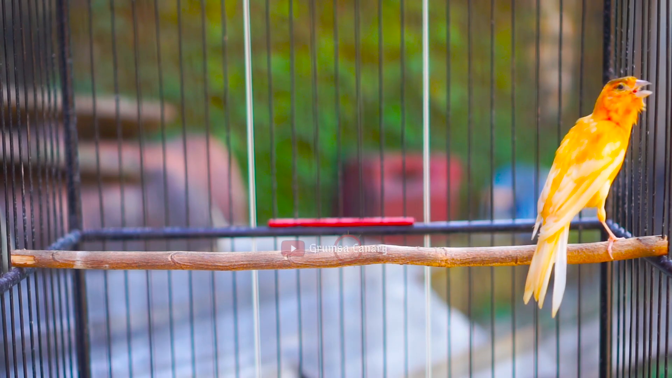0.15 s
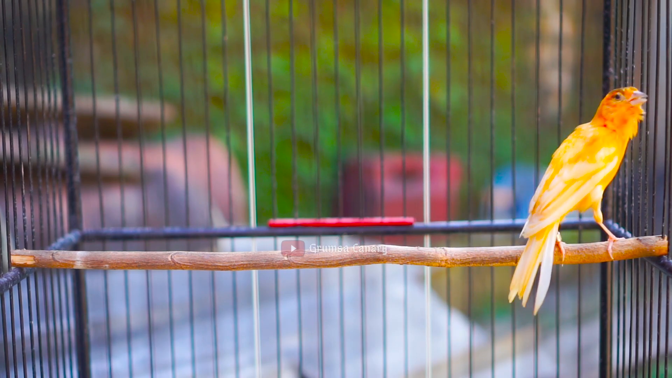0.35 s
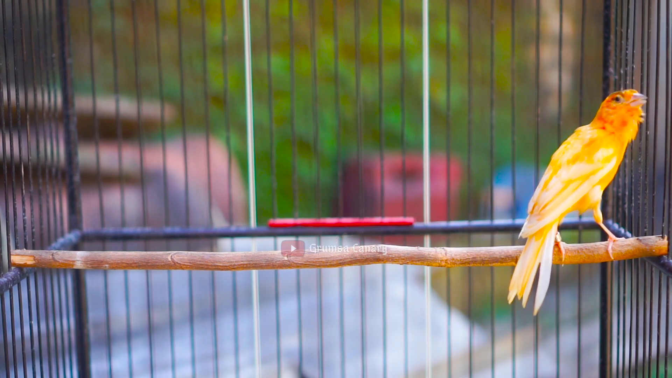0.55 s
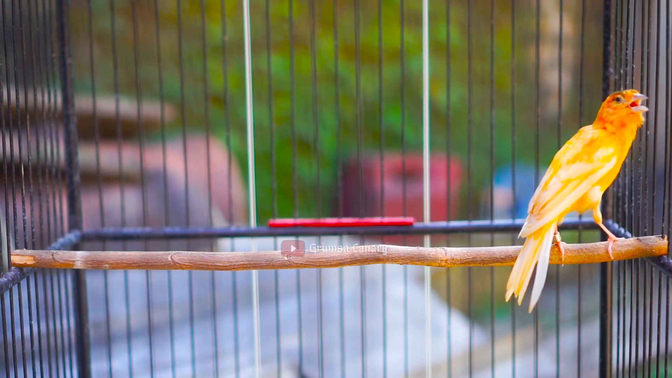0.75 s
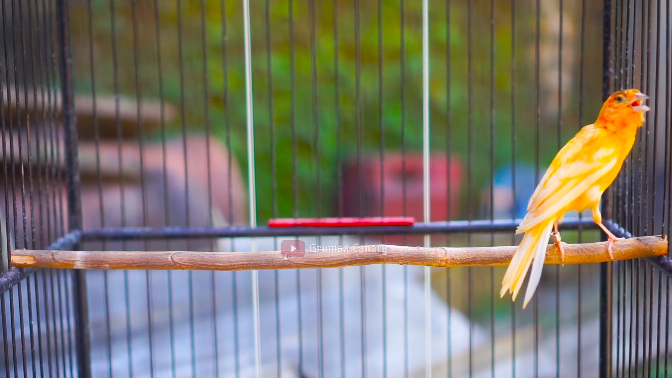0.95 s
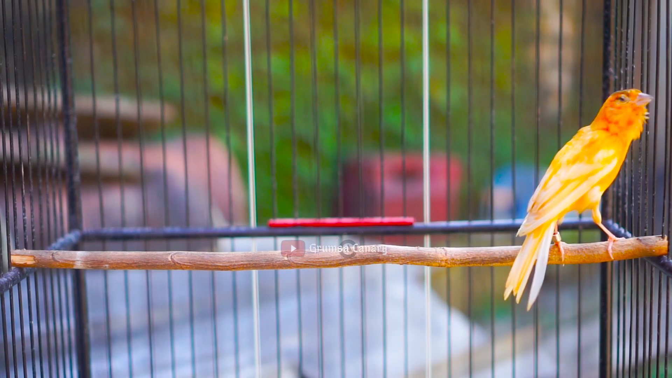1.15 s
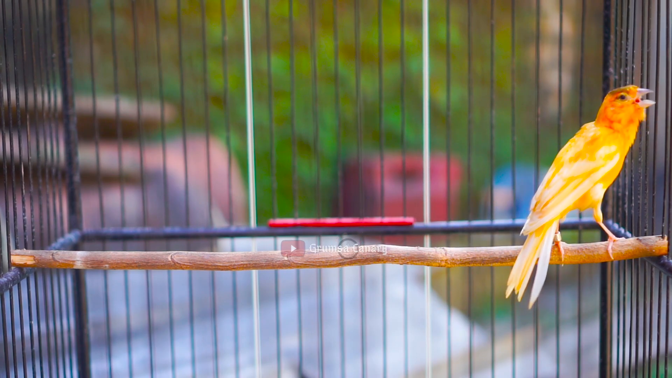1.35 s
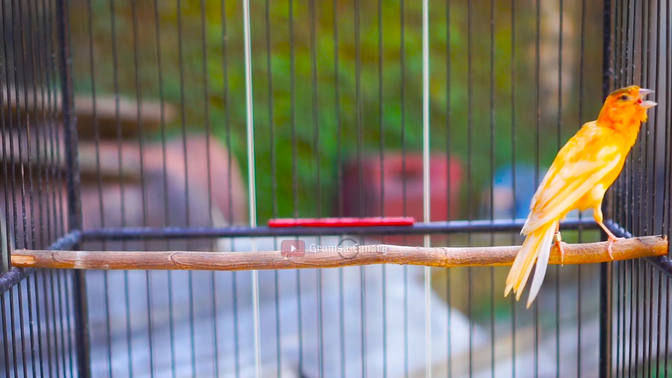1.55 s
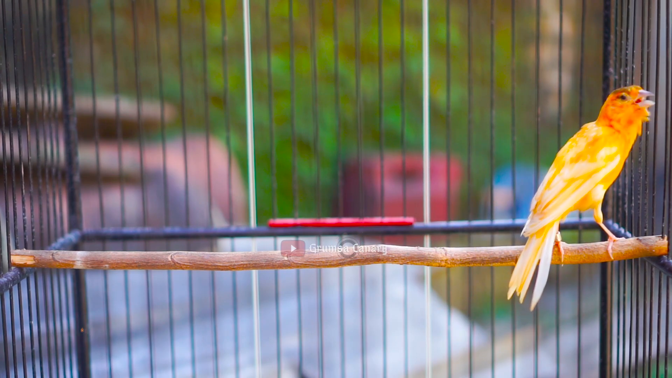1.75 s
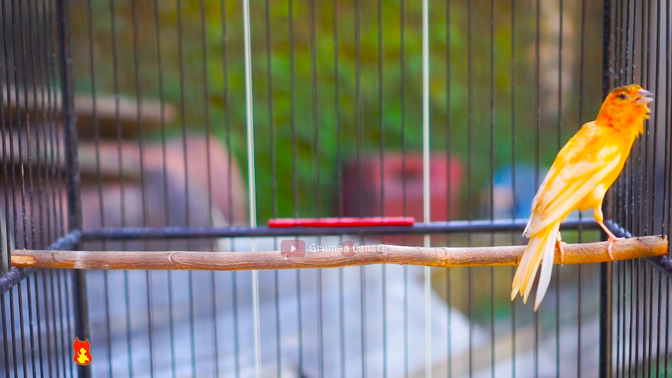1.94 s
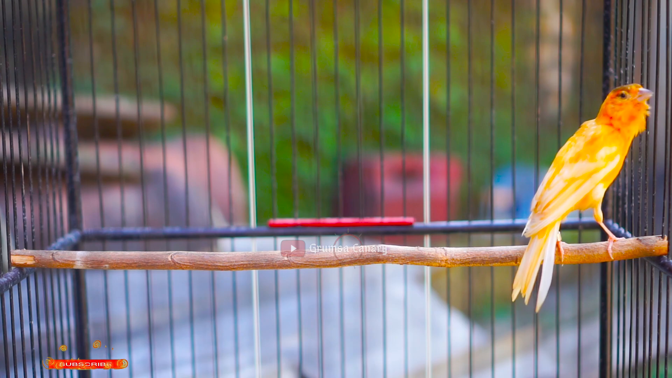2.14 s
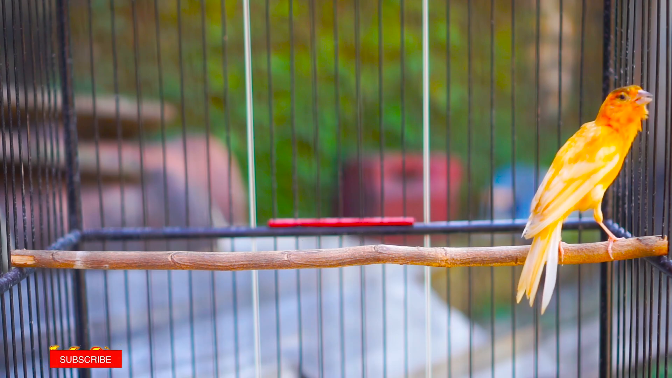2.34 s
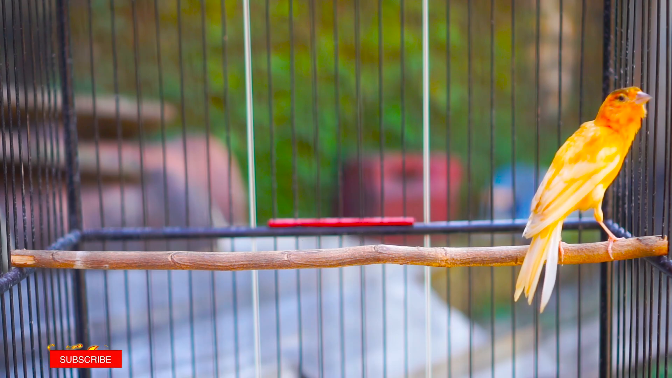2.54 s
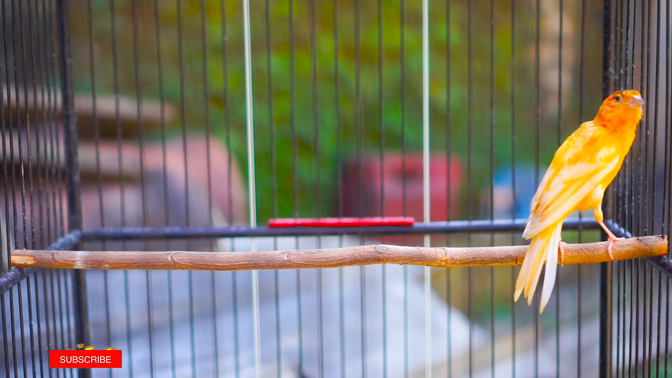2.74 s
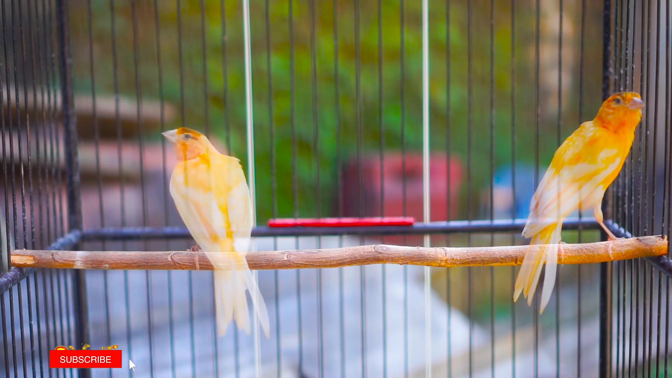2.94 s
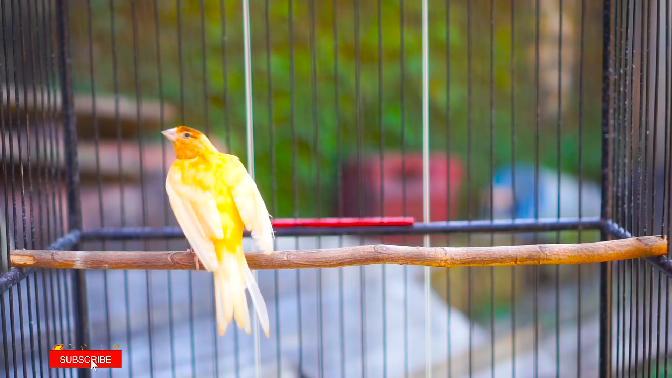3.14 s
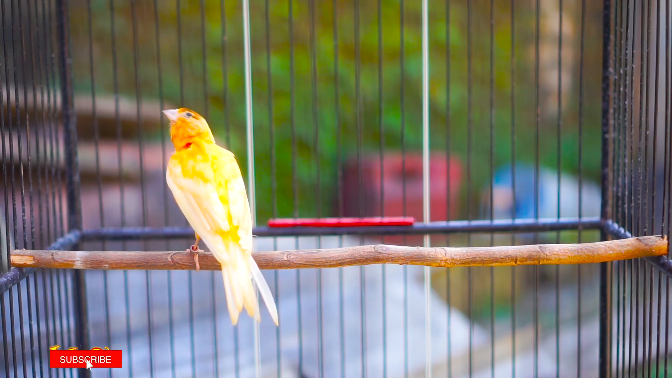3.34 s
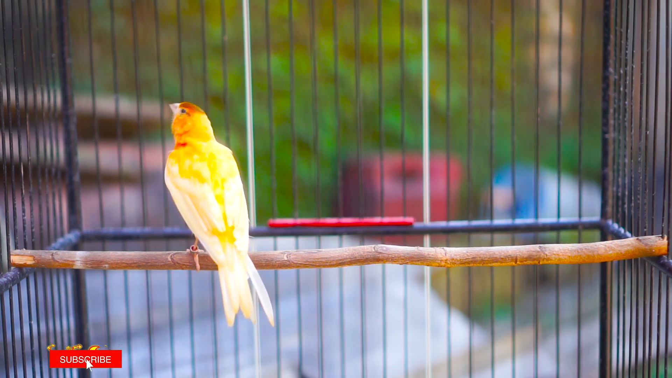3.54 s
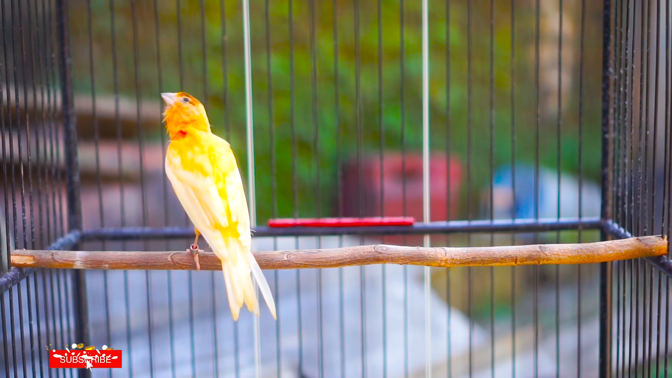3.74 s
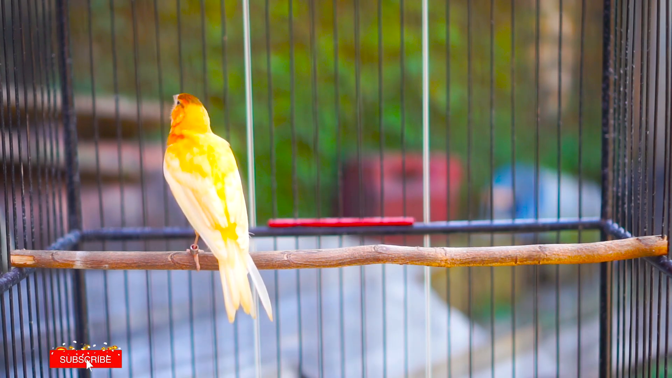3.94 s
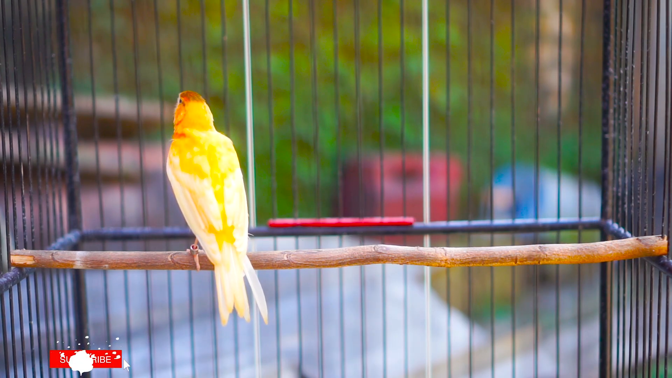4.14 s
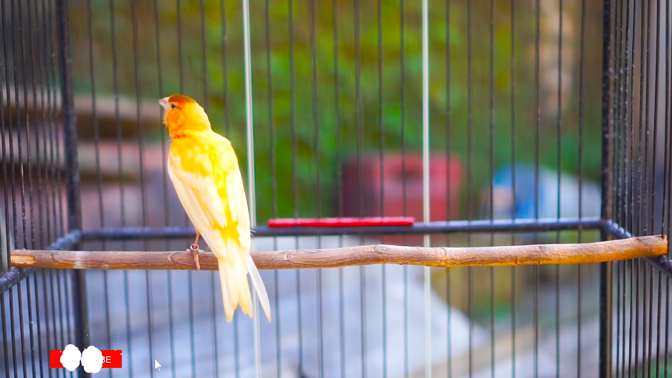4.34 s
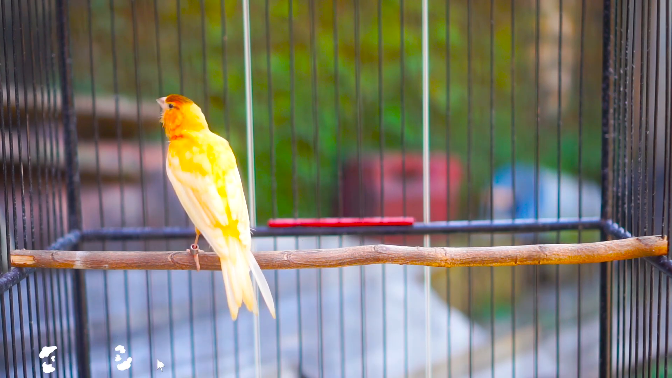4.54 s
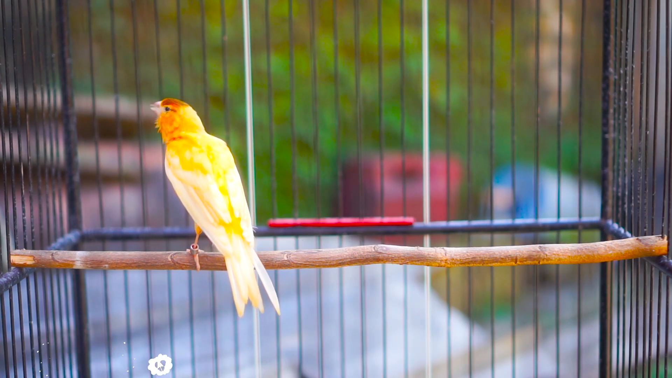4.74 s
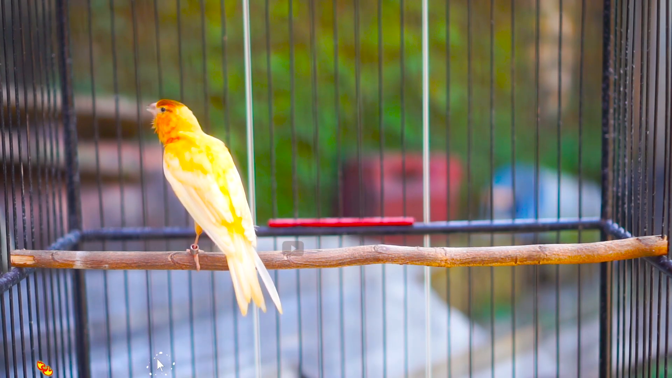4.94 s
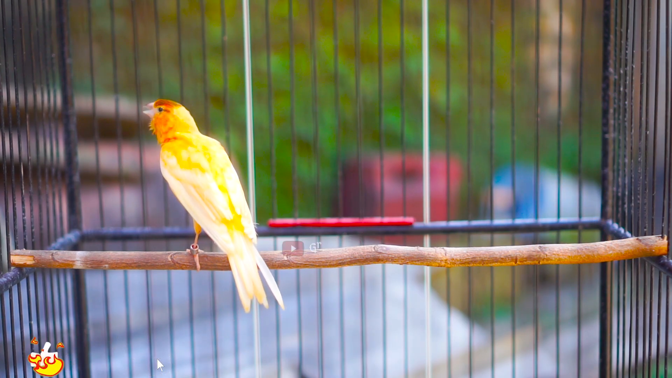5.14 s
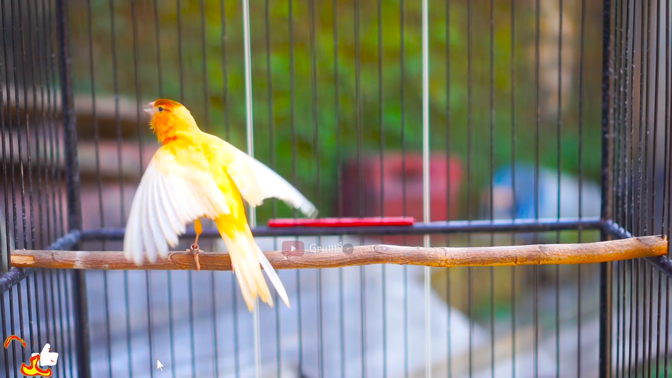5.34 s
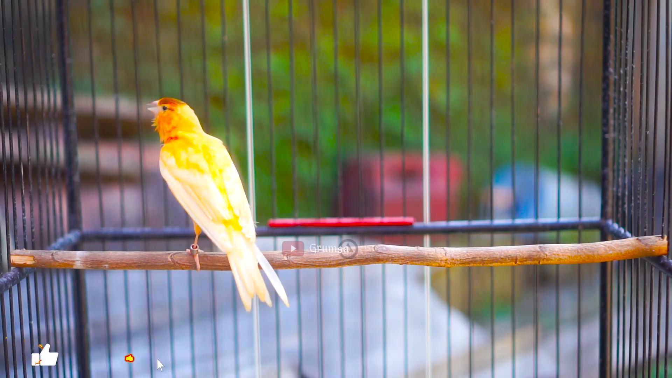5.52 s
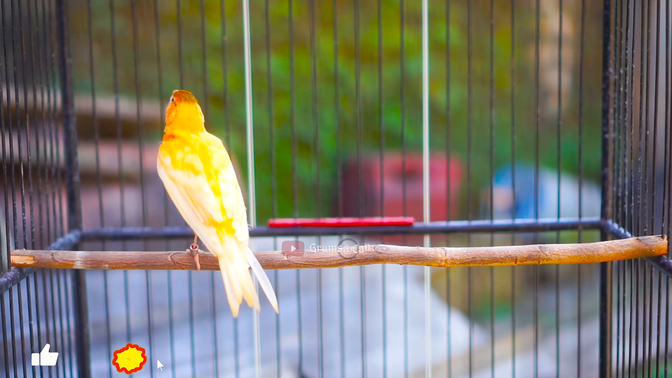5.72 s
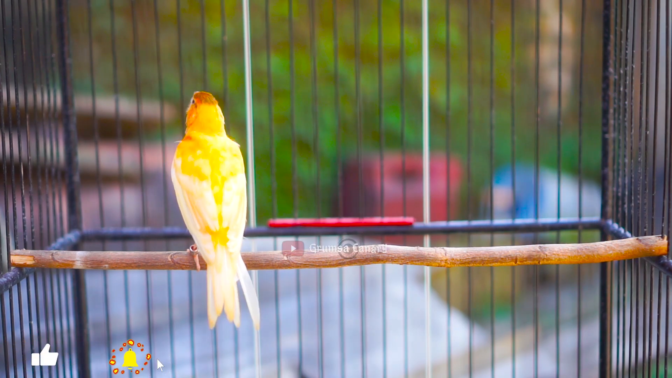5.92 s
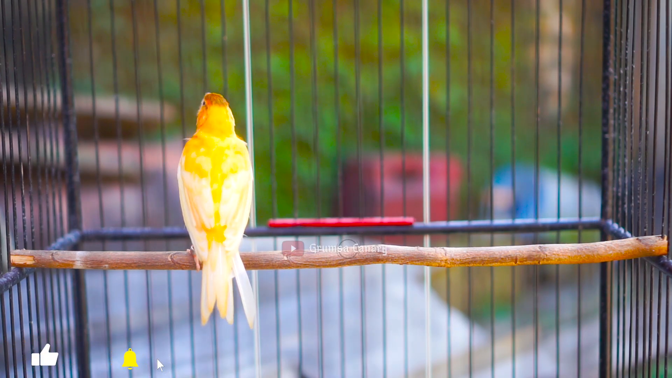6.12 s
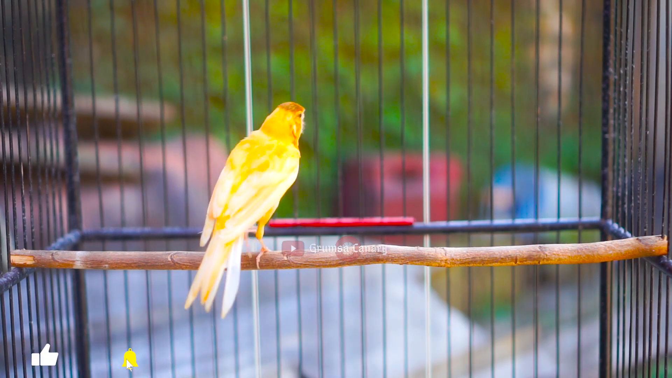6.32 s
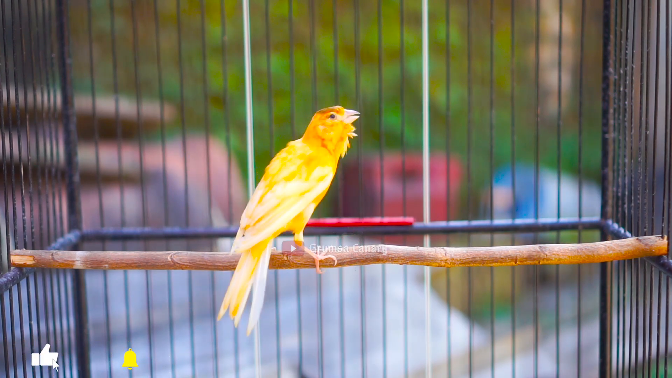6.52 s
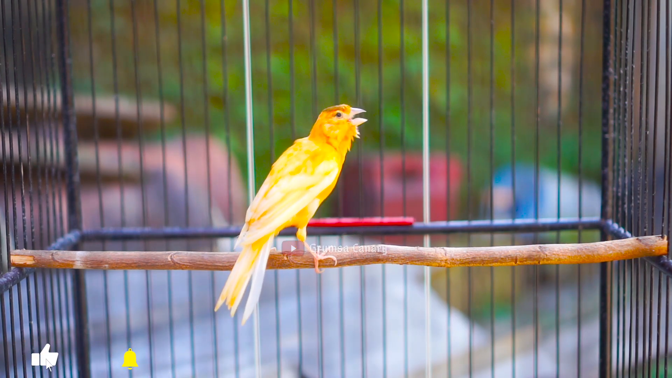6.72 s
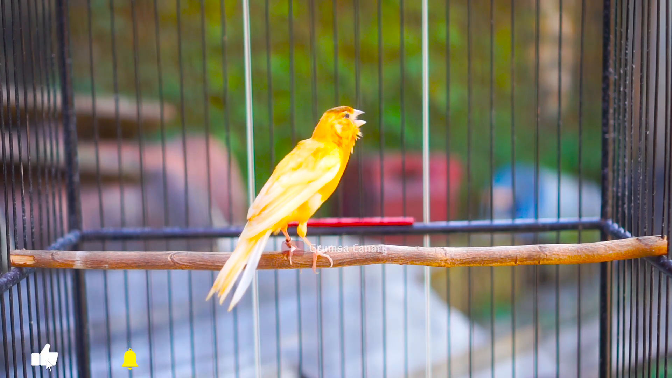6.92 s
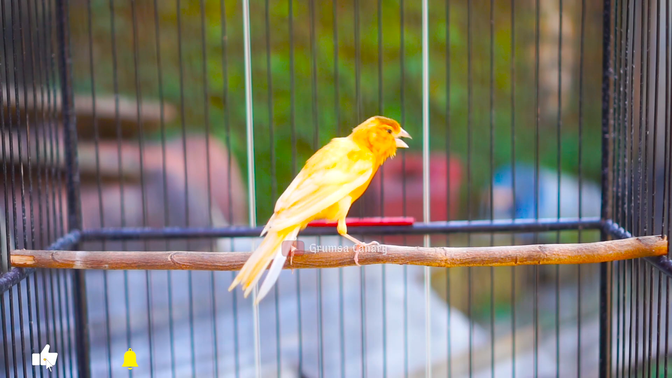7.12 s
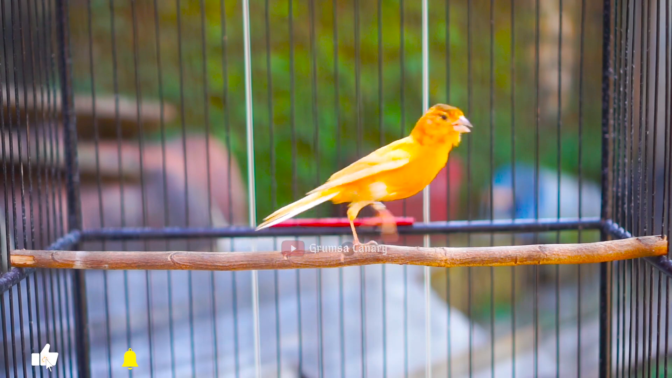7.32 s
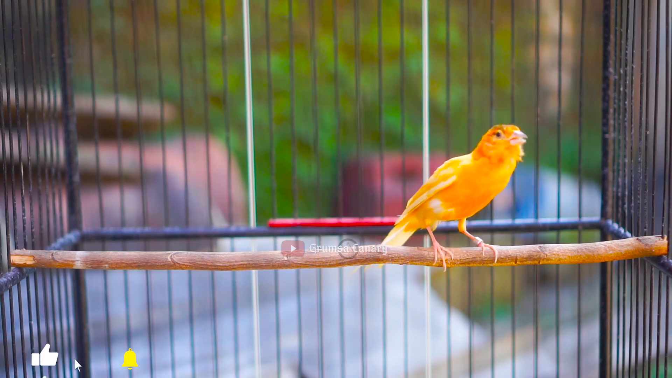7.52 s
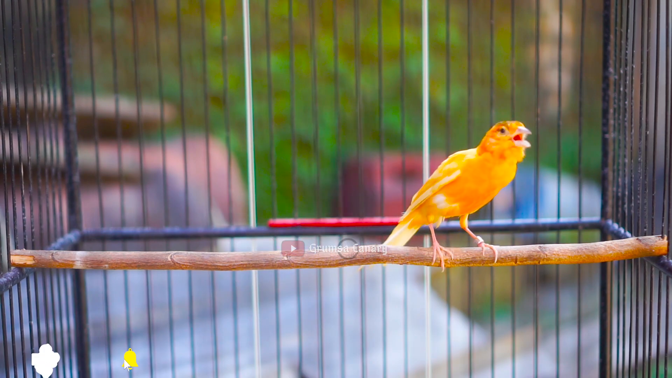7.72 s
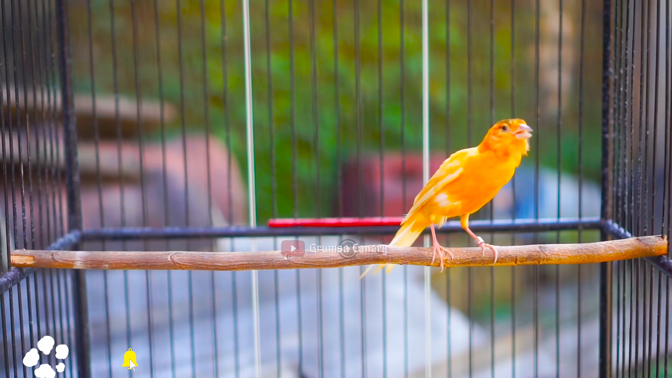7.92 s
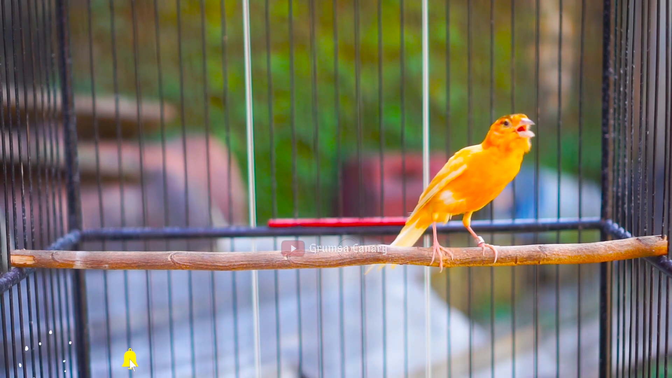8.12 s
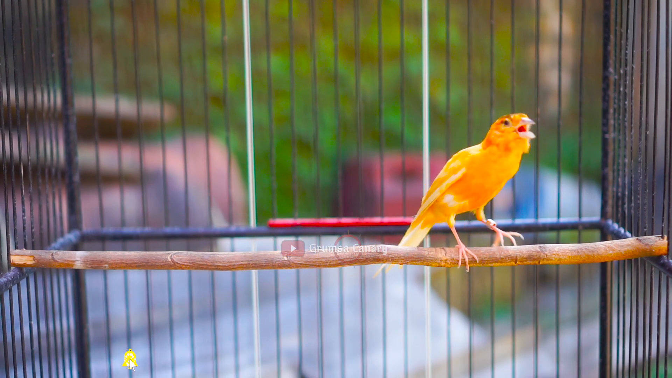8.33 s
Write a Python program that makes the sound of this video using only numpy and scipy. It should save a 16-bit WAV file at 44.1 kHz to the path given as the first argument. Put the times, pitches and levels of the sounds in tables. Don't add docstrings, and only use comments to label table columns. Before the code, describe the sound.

Piercing canary song in a hard-walled room: rapid downward chirps, sweeping slides, a short break, a growing trill, then chirps and slides again.

```python
import sys
import numpy as np
from scipy import signal
from scipy.fft import rfft, irfft, next_fast_len
from scipy.io import wavfile
from scipy.ndimage import uniform_filter1d, map_coordinates

SR = 44100
rng = np.random.default_rng(int(sys.argv[2]) if len(sys.argv) > 2 else 0)


def amplitude_ratio(level_db):
    exponent = np.asarray(level_db, float) / 20
    return 10 ** exponent


def inscribe(sig):
    pcm = np.round(np.clip(np.atleast_2d(sig).T, -1, 1) * 32767)
    wavfile.write(sys.argv[1], SR, pcm.astype(np.int16))


N = 369116


def canary():
    # (share of length [1], share of glide [1], level [dB])
    short_shape = [(-.1, -.3, -63), (0, -0.36, -38.5), (.15, -0.016, -14.5), (.3, 0.29, -5),
                   (.5, .49, -4.5), (.7, .69, 4.5), (.85, 0.893, 6.5), (.97, .99, -6.5), (1.12, 1.0, -33)]
    wide_shape = [(-.05, -0.16, -45.5), (0.031, -0.29, -31.5), (0.148, 0.01, -14), (.3, .18, -10.5),
                  (.46, 0.47, -5), (.6, 0.549, 4.5), (0.8, 0.82, 3), (0.968, 1.0104, -11.5),
                  (1.032, 1.01, -36)]
    trill_shape = [(-0.55, -.75, -56), (-0.21, -0.47, -39.5), (0, 0.13, -19.5), (0.24, 0.29, -6.5),
                   (0.43, .58, 3.5), (0.6, .82, 2.5), (0.76, .96, 4), (0.95, 1.066, -7.5), (1.1, 1.1, -40)]
    arch_shape = [(-.03, 0, -37), (0.051, -.01, -28.5), (.2, .02, -21.5), (0.399, .13, -18.5),
                  (.6, 0.37, -10.5), (.8, 0.67, -2), (0.878, .81, -0.25), (.96, 1, -6), (1.028, 1.0, -40.5)]
    slide_shape = [(-.02, 0.082, -41), (0.051, 0, -36), (.14, 0.09, -21), (.4, .236, -15.5),
                   (.6, .375, -18.5), (.75, 0.55, -6), (.88, .76, -2.1), (.96, 0.97, -4.5),
                   (1.02, 1.0, -45)]
    rise_shape = [(-.02, -.05, -42), (.05, .16, -23), (.12, .38, -7), (.23, .6, -3), (.37, .77, -1),
                  (.5, .915, -3), (.63, .975, -6.5), (.95, .995, -8), (1.02, 1.0, -40)]
    fade_shape = [(-.02, -0.15, -43), (.02, .05, -7.5), (.12, .3, -9), (.25, 0.52, -5.5), (0.399, .71, -11),
                  (0.651, .87, -18.5), (0.798, 0.94, -23), (.9, 1, -29), (0.998, 0.92, -42.5)]
    # (start [s], length [s], glide from [Hz], glide to [Hz], peak level [dB])
    arches = [
        (1.405, 0.14, 7286, 3110, -5.5),
        (7.902, 0.12, 7310, 3155, -5),
    ]
    slides = [
        (1.592, .172, 7680, 3067, -4.5),
        (8.073, 0.16467, 7660, 3225, -3),
        (8.286, 0.15, 7544, 3336, 0.5),
    ]
    rises = [
        (1.979, 0.19, 1873, 5108, -11),
        (2.215, 0.19, 1886, 5094, -10),
    ]
    fades = [
        (1.801, .134, 3176, 5254, -7),
    ]
    pressed_by_type = [5, 4, -4, 5, 7, 5, 5.5]
    even_by_type = [-7, -5.5, -4, -2, -7.5, -1.5, 4.5]
    # (time [s], level [dB])
    breaks = [(7.275, -54.5), (7.388, -61), (7.503, -65), (7.733, -56), (7.852, -62.5)]
    break_hz, break_s = 1330, 0.016

    out = np.zeros((2, N))
    shapes = [short_shape, wide_shape, trill_shape, arch_shape, slide_shape, rise_shape, fade_shape]
    phrases = [short_chirps(), wide_chirps(), trill(), arches, slides, rises, fades]
    for shape, notes, *voice_db in zip(shapes, phrases, pressed_by_type, even_by_type):
        when, glide, shape_db = np.transpose(shape)
        for s, length_s, from_hz, to_hz, db in notes:
            pitch_hz = from_hz + glide * (to_hz - from_hz)
            voice_rows = np.tile(voice_db, (len(when), 1))
            rows = np.c_[s + when * length_s, pitch_hz, db + shape_db, voice_rows]
            if shape is trill_shape:
                rows[:, 2:] += trill_tip(glide, length_s, db)
            add_note(out, rows, whistle)
    for s, db in breaks:
        add_note(out, [(s, 1.07 * break_hz, db, 0, 0), (s + break_s, break_hz, db, 0, 0)], whistle)
    return out


def short_chirps():
    opening_notes = [0, 4, 5]
    return_notes = [0, 1, 12, 13, 17]
    # (time of loud part [s], glide to [Hz], peak level [dB])
    opening = [
        (0.0491, 3030, -12),
        (0.3546, 3050, -12),
        (0.4351, 3075, -12.5),
    ]
    coming_back = [
        (5.5401, 3216, -16.5),
        (5.6191, 3163, -13),
        (6.4485, 3130, -10),
        (6.526, 3105, -11.5),
        (6.8464, 3135, -10.5),
    ]
    duty, loud_at = 0.65, 0.81
    fall_hz, fall_hz_per_db = 2615, 78

    runs = []
    for numbers, rows in [(opening_notes, opening), (return_notes, coming_back)]:
        s, beat_s, to_hz, db = paced(numbers, rows)
        length_s = duty * beat_s
        from_hz = to_hz + fall_hz + fall_hz_per_db * (db + 12)
        runs.append(np.c_[s - loud_at * length_s, length_s, from_hz, to_hz, db])
    return np.concatenate(runs)


def wide_chirps():
    # (start [s], length [s], peak level [dB])
    chirps = [(0.4842, .058, -11), (0.579, .075, -12), (0.6823, .08, -11), (0.796, .083, -11),
              (0.9112, 0.084, -11), (1.037, 0.083, -11.5), (1.1576, .088, -12), (1.276, 0.088, -11.5),
              (6.885, .063, -9), (6.9798, 0.076, -10), (7.0868, 0.082, -9.5), (7.201, 0.086, -9),
              (7.3134, .083, -10), (7.4307, 0.08, -10.5), (7.5442, .082, -11), (7.6565, 0.087, -11.5),
              (7.7724, 0.088, -11.5)]
    fall_hz_per_s, low_hz = 45460, 2639
    full_s, lift_hz_per_s = .08, 11000

    s, length_s, db = np.transpose(chirps)
    to_hz = low_hz + lift_hz_per_s * np.maximum(full_s - length_s, 0)
    return np.c_[s, length_s, to_hz + fall_hz_per_s * length_s, to_hz, db]


def trill():
    trill_notes = [0, 1, 8, 19, 25, 29, 37, 40, 47]
    # (time of loud part [s], glide to [Hz], peak level [dB])
    swell = [
        (3.396, 3930, -49),
        (3.4378, 4550, -36.5),
        (3.6827, 4560, -24),
        (4.0782, 4478, -17.5),
        (4.3057, 4400, -19.5),
        (4.4663, 4410, -16),
        (4.8349, 4538, -12.5),
        (4.998, 4594, -11),
        (5.4033, 4524, -11.5),
    ]
    from_hz = 2800
    duty, loud_at = .42, 0.76

    s, beat_s, to_hz, db = paced(trill_notes, swell)
    length_s = duty * beat_s
    return np.c_[s - loud_at * length_s, length_s, np.full(len(s), from_hz), to_hz, db]


def trill_tip(glide, length_s, db):
    relax_db, soft_press_db_per_db = 12, 1.25
    tip = np.clip(glide, 0, 1) ** 2
    longer_db = 1.14 * (1000 * length_s - 20.9)
    level_db = longer_db * (tip - .5)
    pressed_db = -relax_db * tip - soft_press_db_per_db * (db + 11)
    even_db = relax_db * tip + 2 * longer_db
    return np.c_[level_db, pressed_db, even_db]


def paced(numbers, rows):
    every = np.arange(numbers[-1] + 1)
    s, to_hz, db = [np.interp(every, numbers, column) for column in np.transpose(rows)]
    return s, np.gradient(s), to_hz, db + .6 * rng.standard_normal(len(s))


def whistle(hz, level_db, pressed_db, even_db):
    # (multiple [1], level [dB])
    overtones = [(2, -26.5), (3, -31.5), (4, -47), (5, -54.5)]
    # (frequency [Hz], level [dB])
    brightness = [(5000, -33.5), (8000, -23.5), (9500, -12.5), (12000, 0.5), (15000, 12.5), (17000, -1)]

    size = len(hz)
    jitter = 1 + 0.0009 * wobble(270, size)
    phase = 2 * np.pi * (np.cumsum(hz * jitter) / SR + rng.random())
    over = 0
    for k, over_db in overtones:
        over_hz = k * hz
        voice_db = over_db + pressed_db + even_db * (k == 2) + at_hz(brightness, over_hz)
        effort_db = 0.46 * (level_db - 0.8)
        gain = amplitude_ratio(voice_db + effort_db + 2.5 * wobble(150, size))
        breathy = 1 + 0.19 * wobble(1100, size)
        audible = np.clip((17500 - over_hz) / 1000, 0, 1)
        over = over + gain * breathy * audible * np.sin(k * phase)
    flutter_db = .7 * wobble(110, size)
    return amplitude_ratio(level_db + flutter_db) * np.array([np.sin(phase), over])


def add_note(out, rows, voice):
    s, *columns = np.transpose(rows)
    at = np.arange(max(int(s[0] * SR), 0), min(int(s[-1] * SR), N))
    t = at / SR
    corner = len(at) // 24 + 1
    rising_s = np.maximum.accumulate(s)
    curves = [uniform_filter1d(np.interp(t, rising_s, c), corner, mode="nearest") for c in columns]
    fade = np.clip(np.minimum(t - s[0], s[-1] - t) / 0.004, 0, 1)
    out[..., at] += voice(*curves) * fade


def wobble(hz, size):
    settle = 2000
    noise = rng.standard_normal(12000 * ((size + settle) // 12000 + 1))
    slow = signal.sosfilt(signal.butter(2, hz, fs=SR, output="sos"), noise)[settle:settle + size]
    return slow / slow.std()


def at_hz(points, hz):
    points_hz, value = np.transpose(points)
    return np.interp(np.log(hz), np.log(points_hz), value)


def near_pair(tone, over):
    # (from [s], left minus right [dB], right lag [ms])
    perch = [
        (0, -9.7, .025),
        (3.0, -1.0, .08),
        (4.016, -2.8, .08),
        (4.616, -.4, .08),
        (5.45, -2.9, .045),
        (6.87, -3.7, .045),
        (7.415, -5.8, .025),
    ]
    # (from [s], tray echo [ms], gain [1], wall echo [ms], gain [1])
    left_path = [(0, 1.9, .3, 2.62, .3), (.468, 2.66, .3, .72, .45), (1.38, 2.66, .3, 1.88, .3),
                 (1.79, 2.4, .3, 1.0, .3), (3.3, 1.56, .3, 2.32, .3), (4.016, 2.04, .5, 1.62, .3),
                 (4.616, 2.28, .5, 2.9, .15), (5.45, 2.02, .3, 2.34, .3), (6.245, 1.52, .3, 1.18, .15),
                 (6.87, .72, .5, 2.02, .3), (7.415, .7, .7, 1.36, .3), (7.88, 2.8, .3, .9, .15)]
    right_path = [(0, 1.78, .3, .78, .3), (.468, 1.56, .3, .7, .3), (1.38, 1.56, .3, 2.92, .15),
                  (1.79, 2.44, .3, 1.52, .45), (3.3, 1.82, .5, 2.32, .15), (4.016, 1.08, .3, 2.06, .45),
                  (4.616, 2.04, .7, 1.32, .3), (5.45, 2.02, .3, 2.36, .45), (6.245, 1.52, .5, 1.18, .15),
                  (6.87, 1.76, .3, .7, .45), (7.415, .7, .7, 1.8, .45), (7.88, 1.56, .3, 2.86, .15)]
    left_share = .7

    pan_db, lag_ms = held(perch)
    left = near_echoes(tone + over, left_path)
    late = delayed(tone, lag_ms) + delayed(over, 0.45 * lag_ms)
    right = near_echoes(late, right_path)
    return np.array([amplitude_ratio(left_share * pan_db) * left, amplitude_ratio((left_share - 1) * pan_db) * right])


def near_echoes(x, path):
    tray_ms, tray_gain, wall_ms, wall_gain = held(path)
    tray_gain, wall_gain = 1.25 * tray_gain, 1.25 * wall_gain
    total = x + tray_gain * delayed(x, tray_ms) + wall_gain * delayed(x, wall_ms)
    return total / np.sqrt(1 + tray_gain ** 2 + wall_gain ** 2)


def held(rows):
    rows = np.array(rows)
    current = np.searchsorted(rows[:, 0] * SR, np.arange(N), "right") - 1
    return rows[np.maximum(current, 0), 1:].T


def delayed(x, ms):
    return map_coordinates(x, [np.arange(N) - ms * SR / 1000], order=3)


def room(x):
    # (level [dB], T60 [s])
    tails = [(-4.5, 0.17), (-29, 1)]
    # (delay [ms], level [dB])
    far_wall = [(17, -12.5), (11, -31.5)]
    edge_hz, above_db = 5400, -3

    t = np.arange(int(.7 * SR)) / SR
    kernel = 0
    for (db, t60_s), noise in zip(tails, rng.standard_normal((2, 2, len(t)))):
        kernel = kernel + amplitude_ratio(db - 60 * t / t60_s) * noise / np.sqrt(t60_s * SR / np.log(1e6))
    kernel = kernel * np.clip(t / 0.0012 - .5, 0, 1)
    for ms, db in far_wall:
        at = int(ms * SR / 1000)
        kernel[[0, 1], [at, at + 5]] += amplitude_ratio(db)
    kernel = signal.sosfilt(signal.butter(1, 9000, fs=SR, output="sos"), kernel)
    low = signal.sosfilt(signal.butter(6, edge_hz, fs=SR, output="sos"), kernel)
    return convolve(x[None], (1 - amplitude_ratio(above_db)) * low + amplitude_ratio(above_db) * kernel)


def convolve(x, kernel):
    return signal.fftconvolve(x, kernel, axes=-1)[..., :N]


def far_bird():
    # (start [s], length [s], from [Hz], to [Hz], peak level [dB])
    far_notes = [
        (2.15, .73, 2776, 2750, -53.5),
        (3.06, 0.047, 4810, 2910, -53.5),
        (3.185, .055, 4670, 2900, -56),
        (3.3, 0.036, 4730, 2890, -52.5),
        (6.04, .36, 3140, 2750, -44.5),
        (6.86, .27, 2584, 2100, -42.5),
        (7.1, .24, 2480, 2750, -34),
        (7.3, .3, 2447, 2000, -46.5),
        (7.58, .17, 2035, 2400, -61),
    ]
    chatter = [
        (3.78, .32, 5558, 5720, -47.5),
        (3.8, .67, 3814, 4300, -35),
    ]
    # (share of length [1], level [dB])
    far_shape = [(0, -12.5), (0.248, -2.5), (0.799, -6), (1, -19.5)]

    out = np.zeros((2, N))
    when, shape_db = np.transpose(far_shape)
    for notes, spread_hz in [(far_notes, 145), (chatter, 800)]:
        for s, length_s, from_hz, to_hz, db in notes:
            pitch_hz = from_hz + when * (to_hz - from_hz)
            spread = np.full(len(when), spread_hz)
            rows = np.c_[s + when * length_s, pitch_hz, spread, db + shape_db]
            for channel in out:
                add_note(channel, rows, blurred)
    t = np.arange(int(.2 * SR)) / SR
    blur = rng.standard_normal((2, len(t))) * amplitude_ratio(-60 * t / 0.15)
    return convolve(out, blur / np.sqrt(np.mean(np.sum(blur ** 2, axis=1))))


def blurred(hz, spread_hz, level_db):
    pitch_hz = hz + spread_hz * np.tanh(wobble(96, len(hz)))
    return amplitude_ratio(level_db) * wobble(120, len(hz)) * np.sin(2 * np.pi * np.cumsum(pitch_hz) / SR)


def background(song):
    # (time [s], level [dB])
    traffic = [(0.0, -88), (0.11, -63.5), (1.26, -88), (2.33, -80.5), (2.4, -55.5), (2.87, -69),
               (4.87, -68), (4.94, -59.5), (5.01, -54.5), (5.08, -71), (5.36, -64), (5.69, -72.5),
               (6.27, -66.5), (7.04, -75.5), (7.25, -71), (8.37, -82)]
    # (frequency [Hz], density [dB per Hz])
    rumble_colour = [(15, -79), (25, -48.5), (77, -16), (108, -15), (129, -8), (170, -19.5), (220, -51),
                     (370, -120)]
    hiss_colour = [(100, -38.5), (170, -7.5), (244, -7), (300, -12), (464, -11.5), (730, -13.5),
                   (1090, -17.5), (2500, -18), (3400, -19), (4400, -23.5), (6090, -30), (10000, -32),
                   (15700, -31)]
    air_colour = [(2000, -40.5), (4000, -4.5), (8000, -6), (12000, 2), (16000, -1.5)]
    step_s, shake_s, shake_t60_s = 3.0, 3.81, 1.6

    t = np.arange(N) / SR
    traffic_db = np.interp(t, *np.transpose(traffic)) + 1.3 + 1.3 * wobble(5, N)
    rumble = amplitude_ratio(traffic_db) * coloured(rumble_colour)

    song_power = np.abs(uniform_filter1d(song ** 2, int(.4 * SR), mode="reflect"))
    song_db = 10 * np.log10(song_power + 1e-9)
    duck_db = 0.38 * np.maximum(song_db + 25, 0)
    hiss = amplitude_ratio(-60 + 1 * (t > step_s) - duck_db) * coloured(hiss_colour)

    air = amplitude_ratio(np.where(t < step_s, -79, -70 - 1.1 * (t - step_s)))
    shake_db = -67 - 60 * np.abs(t - shake_s) / shake_t60_s + 1.5 * wobble(25, N)
    shake = (t > shake_s) * amplitude_ratio(shake_db)
    return rumble + hiss + (air + shake) * coloured(air_colour)


def coloured(spectrum):
    # (frequency [Hz], correlation [1])
    likeness = [(60, 0.98), (150, 1), (380, 0.23), (950, -0.16), (2380, -0.73), (5980, 0.93),
                (15000, -0.48)]
    # (frequency [Hz], level [dB])
    balance = [(60, -2), (240, 0), (950, -2.5), (3770, -3.5), (15000, -0.5)]
    # (frequency [Hz], width [Hz], level [dB])
    hums = [(98, 15, 11), (133, 14, 1.5), (183, 15, -1.5), (233, 3.9, 10), (300, 16, 4.5), (494, 16, 8),
            (749, 27, 6), (860, 20, 6.5), (1516, 410, 5.5)]

    size = next_fast_len(N)
    hz = np.maximum(np.arange(size // 2 + 1) * SR / size, 1)
    mid, side = rfft(rng.standard_normal((2, size)))
    alike = np.clip(at_hz(likeness, hz), -1, 1)
    hums_db = sum(db / (1 + (2 * (hz - mode_hz) / width_hz) ** 2) for mode_hz, width_hz, db in hums)
    sign = np.array([[1], [-1]])
    pair = np.sqrt(1 + alike) * mid + sign * np.sqrt(1 - alike) * side
    pair = pair * amplitude_ratio(sign * at_hz(balance, hz) / 2)
    out = irfft(pair * amplitude_ratio(at_hz(spectrum, hz) + hums_db), size)[:, :N]
    return out / out.mean(axis=0).std()


def scene():
    tone, over = canary()
    near = near_pair(tone, over)
    wet = room(tone + amplitude_ratio(4.5) * over)
    return near + wet + far_bird() + background(tone + over)


def top_cut(x):
    return signal.sosfilt(signal.butter(12, 15830, fs=SR, output="sos"), x)


def record(dry):
    return top_cut(np.clip(dry, -1.05, 1.05))


dry = scene()
out = record(dry)
inscribe(out)
```